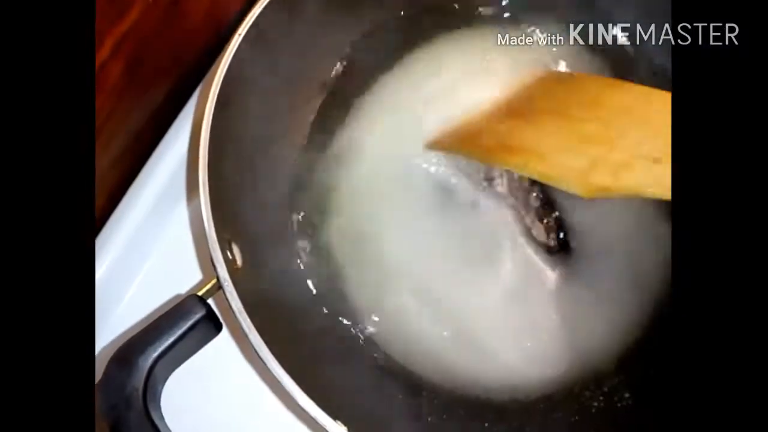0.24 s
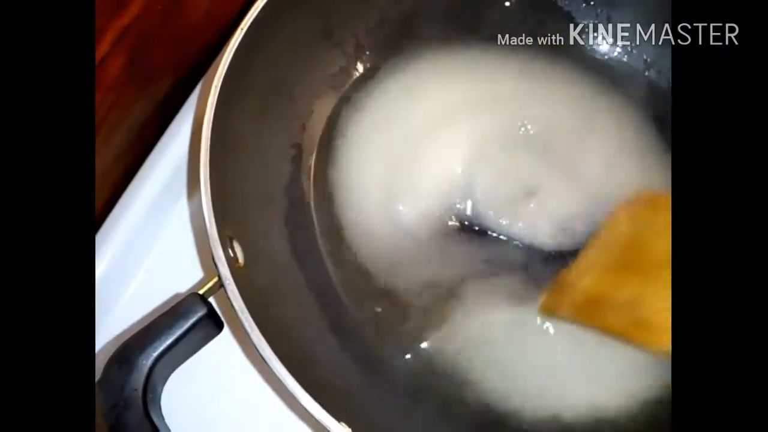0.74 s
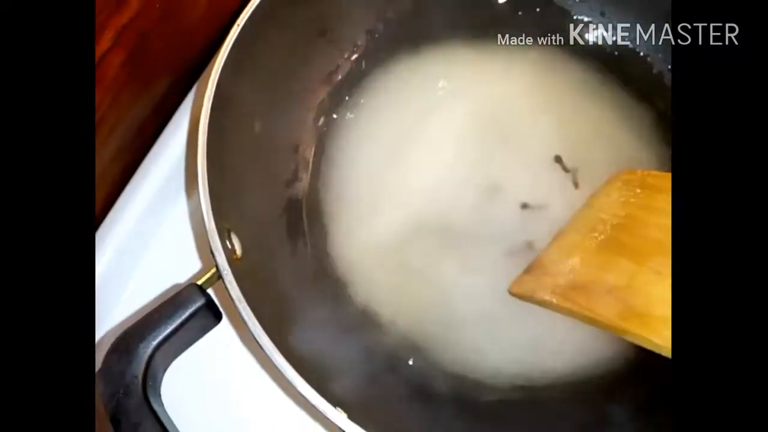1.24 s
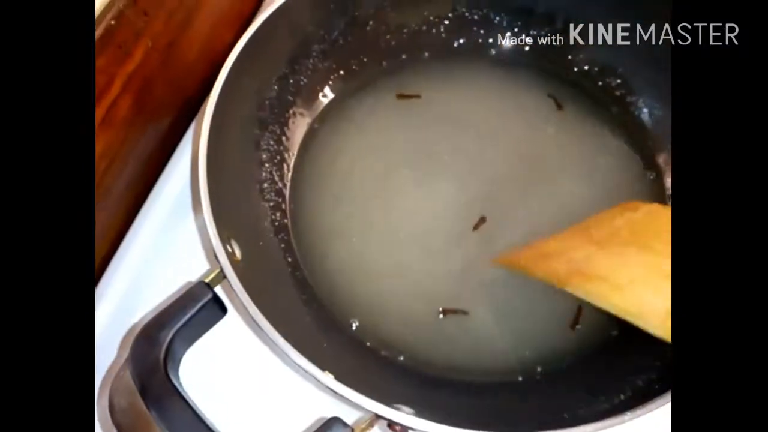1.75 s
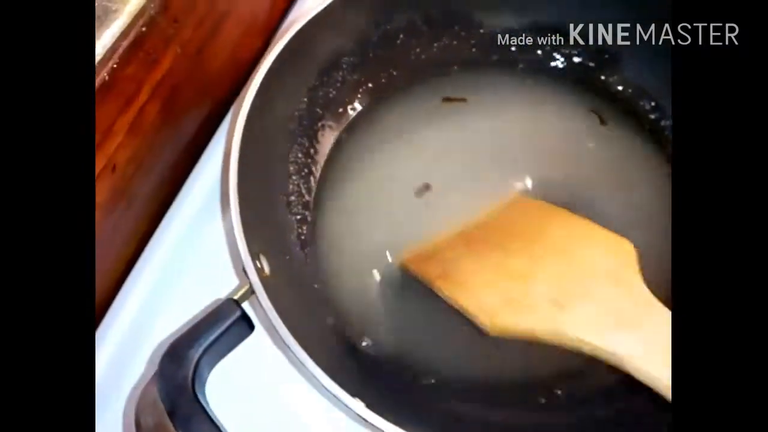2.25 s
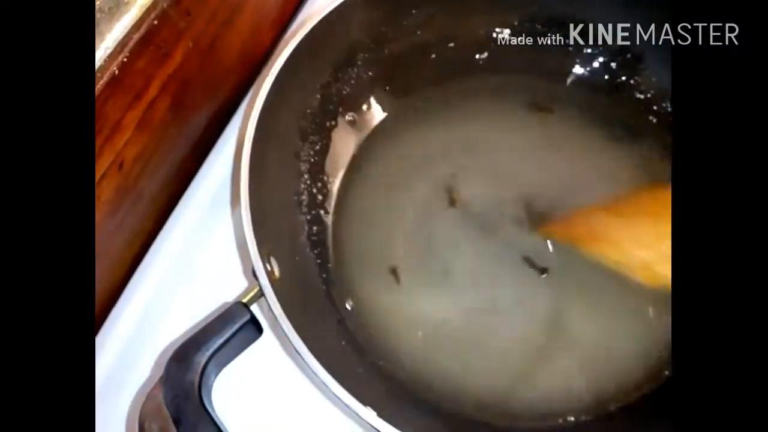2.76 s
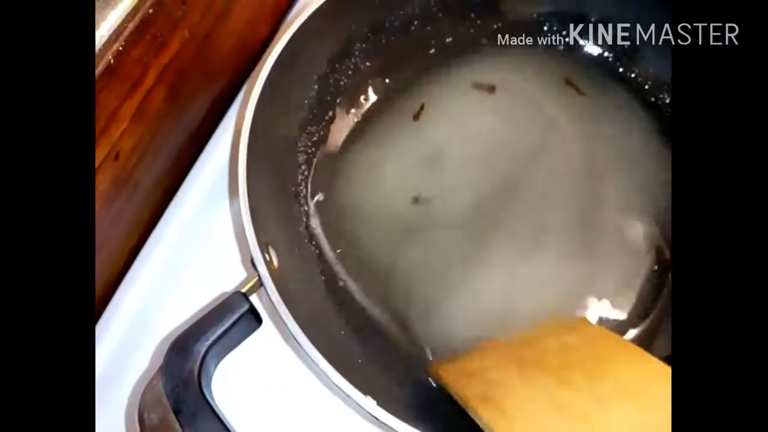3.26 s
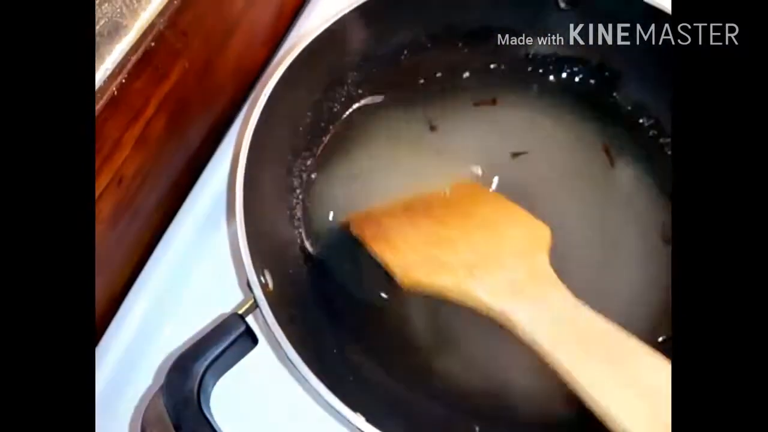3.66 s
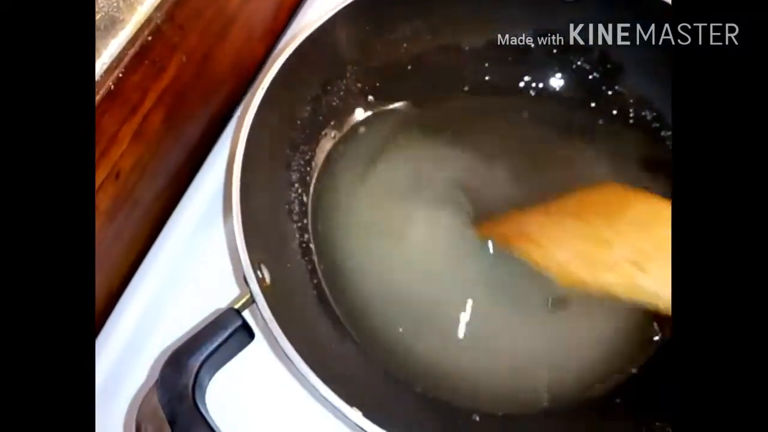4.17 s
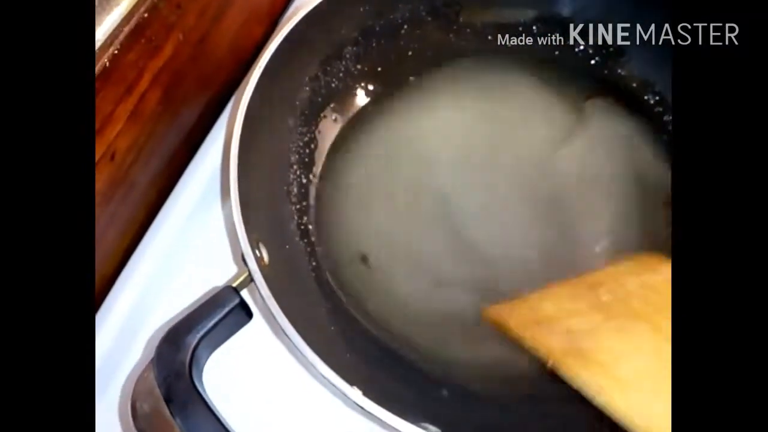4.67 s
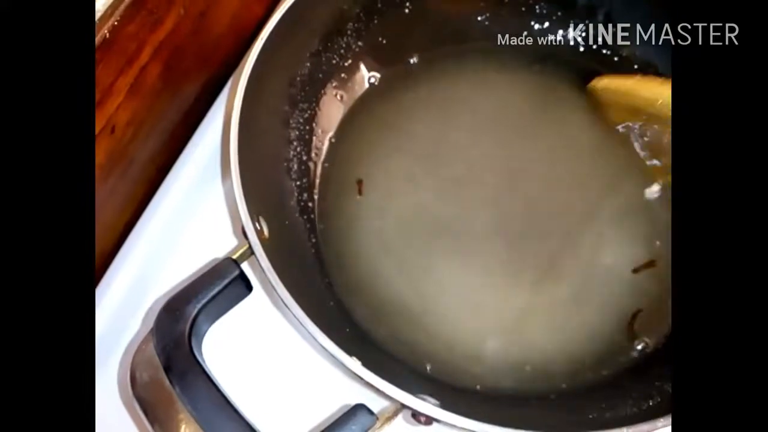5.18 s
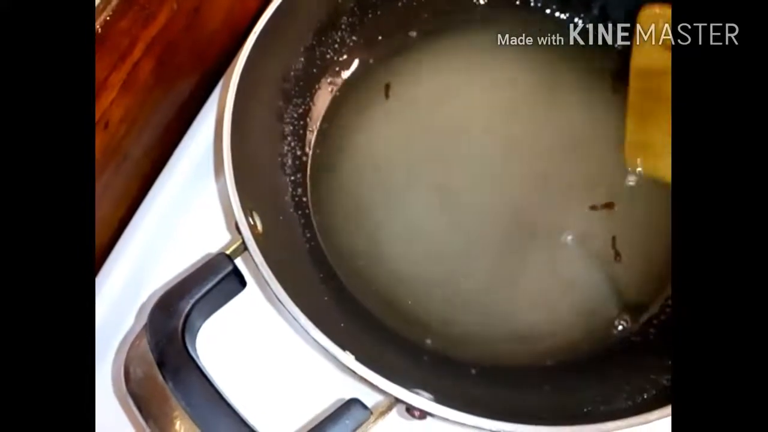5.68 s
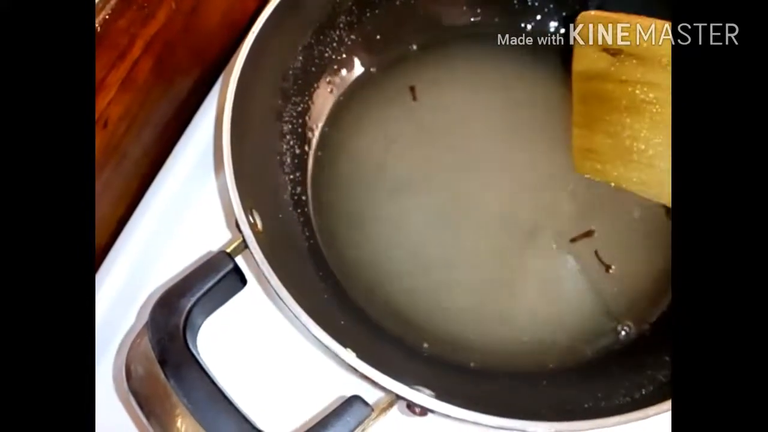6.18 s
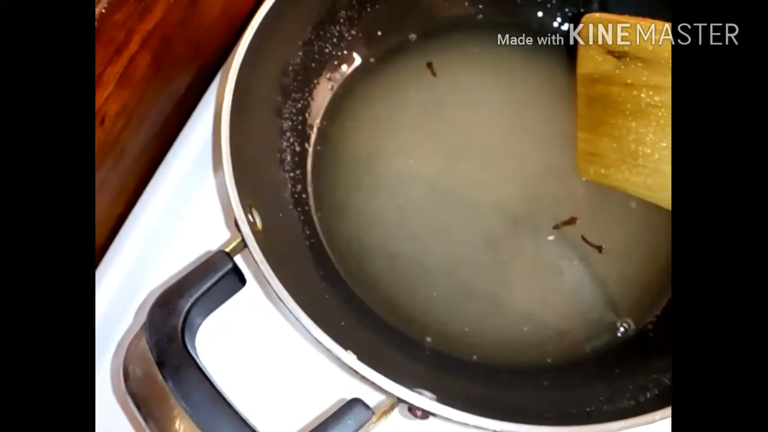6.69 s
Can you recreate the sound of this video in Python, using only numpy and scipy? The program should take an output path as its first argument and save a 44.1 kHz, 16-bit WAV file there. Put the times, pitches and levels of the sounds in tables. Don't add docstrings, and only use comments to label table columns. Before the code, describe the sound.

Close, gritty scraping of wood in a sugary metal pan, opening with a ringing knock and short groan, then quiet room hum.

```python
import sys
import numpy as np
from scipy import signal
from scipy.fft import rfft, irfft, next_fast_len
from scipy.io import wavfile
from scipy.ndimage import uniform_filter1d, map_coordinates

SR = 44100
rng = np.random.default_rng(int(sys.argv[2]) if len(sys.argv) > 2 else 0)


def file_out(sig):
    cols = np.atleast_2d(sig).T
    lim = np.clip(cols, -1, 1)
    pcm = np.round(lim * 32767).astype(np.int16)
    wavfile.write(sys.argv[1], SR, pcm)


def field_ratio(decibels):
    return 10 ** (np.asarray(decibels, dtype=float) / 20)


N = 305605
T = np.arange(N) / SR

# start_s, pressure_db, speed_db
SLIDE_OFF = [(0, -40, -40.5), (.05, -46.5, -48.5), (.09, -40, -48), (.136, -44, -50.5), (.165, -53, -54.5),
             (.254, -52.5, -59), (.352, -67, -64), (.41, -70, -70), (.47, -85.5, -61)]
FLICK = [(0.475, -69, -64), (0.509, -43.5, -47), (0.531, -56.5, -54), (0.579, -53.5, -44.5),
         (0.693, -41.5, -39), (0.795, -48.5, -49.5), (0.831, -63.5, -67), (0.915, -75.5, -73),
         (0.92, -73, -73)]
PUSH = [(2.035, -59, -86), (2.051, -54, -63), (2.15, -50, -55), (2.267, -44, -48.5), (2.361, -39, -50),
        (2.391, -40.5, -49.5), (2.49, -40.5, -48.5), (2.56, -49.5, -49), (2.62, -44.5, -56)]
PULL = [(2.625, -62, -55.5), (2.651, -50.5, -54), (2.663, -49, -58), (2.687, -48.5, -53.5),
        (2.837, -49.5, -49), (3.015, -48, -46.5), (3.13, -70, -60.5)]
DABS = [(3.135, -61, -58), (3.147, -77, -68), (3.159, -49, -49), (3.173, -93, -50.5), (3.249, -63, -62.5),
        (3.263, -62.5, -48), (3.283, -54, -65), (3.331, -64, -66.5), (3.44, -71, -60.5)]
SWEEP = [(3.446, -52.5, -45), (3.494, -47, -53.5), (3.656, -44.5, -52), (3.682, -47.5, -57),
         (3.798, -46.5, -59.5), (3.96, -56.5, -58.5), (4.032, -43.5, -57), (4.058, -61.5, -69),
         (4.125, -47.5, -56.5)]
SCRAPE = [(4.13, -52, -75), (4.146, -45.5, -42), (4.15, -42.5, -48), (4.226, -49.5, -45), (4.41, -46, -41),
          (4.482, -59.5, -52), (4.532, -79.5, -65.5), (4.614, -72, -79), (4.62, -78, -76)]
STROKES = [SLIDE_OFF, FLICK, PUSH, PULL, DABS, SWEEP, SCRAPE]
# grate_db, wall_db, blade_share_db, favoured_wall_pitch_hz
STROKE_PLACES = [
    (1.5, 1.5, 4, 1474),
    (-1, 2.5, 1.5, 1300),
    (-1, 4.5, 2.5, 1500),
    (3.5, 5, -1.5, 1430),
    (3, 0.5, -3.5, 1420),
    (-3.5, 4.5, 1, 1557),
    (-0.5, 2, 2.5, 1385),
]
# time_s, pitch_hz
BLADE_PITCH = [(0, 776), (.6, 812), (.8, 828), (2.15, 745), (2.33, 753), (2.4, 893), (2.5, 940), (2.6, 913),
               (2.7, 793), (3.05, 804), (3.5, 780), (3.65, 795), (3.85, 866), (4, 850), (4.2, 803),
               (4.5, 870)]
# pitch_hz, width_hz, level_db
GRATE_MODES = [(102, 24, -6), (149.9, 13.8, -2), (158.6, 29, 6), (185, 33, -3), (211.5, 12, -1)]
# pitch_hz, width_hz, level_db
LOW_FLOOR_MODES = [(347.3, 33, 2.5), (428, 19, -8.5), (471, 34, -5), (486, 120, 0.5), (581, 15, -13)]
# pitch_hz, width_hz, level_db
HIGH_FLOOR_MODES = [(635, 150, -7), (771, 130, -2.5), (777, 66, 1), (850, 150, -2.5), (899, 8, -5),
                    (1016, 15, -7), (1057, 25, 8.5)]
# pitch_hz, width_hz, level_db
WALL_MODES = [(1273, 170, -18.5), (1384, 113, 15.5), (1491.4, 80, 15), (1567, 150, 13), (1698, 72, 9.5),
              (2020, 200, 3)]
# pitch_hz, width_hz, level_db
RIM_MODES = [(2344, 620, 1.5), (2618, 290, 2.5), (2880, 200, 3.5), (3280, 830, 4), (3570, 200, 7),
             (4080, 400, -4.5), (4444, 210, 4.5), (4695, 350, 4), (5100, 610, 1), (5680, 620, -3),
             (6250, 500, 5), (6580, 350, 0.5), (7460, 710, -2.5)]
# freq_hz, density_db
FINE_GRIT = [(1500, -19), (2500, 3.5), (6000, 14.5), (8000, 10.5), (11000, -3.5), (16000, -16.5)]
# start_s, peak_db, centre_hz
CRACKS = [(0.0634, -26.5, 7350), (0.13, -31, 5850), (0.504, -27, 5000), (0.5473, -33.5, 5200),
          (.562, -30, 6030), (.612, -26.5, 6020), (0.64, -27.5, 6160), (0.685, -17.5, 6580),
          (0.7417, -30.5, 6560), (0.809, -36.5, 6500), (2.094, -40.5, 6400), (2.1306, -33, 4940),
          (2.37, -28.5, 6200), (2.456, -38, 3420), (2.5939, -40.5, 3360), (2.7648, -32.5, 3550),
          (2.824, -31, 4650), (2.888, -26, 6500), (3.1577, -43.5, 3032), (3.2594, -40.5, 2600),
          (3.4463, -22.5, 7100), (4.0014, -42, 3280), (3.932, -45, 3444), (4.0716, -40, 6300),
          (4.144, -34, 3200), (4.188, -43, 5000), (4.252, -36, 3570), (4.2677, -30.5, 5670),
          (4.3104, -25.5, 6300), (4.3997, -18.5, 3680)]
# start_s, thud_db, wall_clack_db, grate_db
BUMPS = [(0.13, -27, -29.5, -27.5), (0.507, -31, -38, -20), (0.7443, -31, -52, -32),
         (2.0491, -36, -34.5, -27), (2.0523, -20, -39, -11), (2.0953, -35, -54, -14.5),
         (2.1314, -45, -35, -21), (2.165, -40, -62, -21.5), (2.5919, -25, -46, -22),
         (2.641, -41.5, -55, -27), (2.8733, -36, -50, -33), (3.268, -28.5, -40, -23),
         (3.4472, -32, -25.5, -32.5), (4.001, -32, -54, -23.5), (4.131, -23, -65, -17.5),
         (4.3089, -32, -32, -25)]
# pitch_hz, width_hz, level_db
NUDGE_MODES = [(138, 41, 7.5), (378, 420, -1), (558, 380, -5.5)]
# pitch_hz, level_db, t60_s
KNOCK_MODES = [(138.3, 2.5, 0.44), (212.7, -4.5, 0.23), (333.5, -5, 0.23), (471, -12.5, 0.26),
               (721, -26.5, 0.98), (866, -35.5, 0.28), (1083, -17.5, 0.5), (1833, -17.5, 0.25),
               (1940, -14.5, 0.43), (2143, -22, 0.28)]
# time_s, slip_rate_hz, level_db
JUDDER = [
    (0.15, 352, -51),
    (0.168, 347, -59),
    (0.198, 366.6, -49),
    (0.24, 375, -52.5),
    (0.31, 361.5, -47),
    (0.365, 360.5, -55.5),
    (0.41, 383, -78),
]
# multiple, level_db
SLIP_HARMONICS = [(1, 2), (2, -9.5), (3, -14.5), (4, -38), (5, -25)]
# freq_hz, density_db
ROOM_HISS = [(20, -14.5), (40, -37), (95, -17), (200, -18.5), (420, -17.5), (1030, -22), (3000, -28.5),
             (6500, -31.5), (16000, -40)]
# freq_hz, gain_db
HISS_TOP = [(13600, 0), (14400, 14), (15500, 2.5)]
# pitch_hz, width_hz, level_db
HUM = [(103.7, 42, -65.5), (171.7, 8.8, -63), (312, 17.7, -66)]
# pitch_hz, level_db
WHINE = [(689, -84), (5244, -93), (10475, -86)]
# freq_hz, left_right_likeness (-1 to 1)
ROOM_ALIKE = [(60, 0.4), (180, 0.79), (550, 0.2), (1650, -0.16), (4970, 0.06), (15000, -0.12)]
# freq_hz, left_right_likeness (-1 to 1)
PAN_ALIKE = [(60, 0.78), (150, 1), (380, 0.74), (950, 0.79), (2380, 0.19), (5980, -0.14), (15000, 0.02)]
# freq_hz, left_minus_right_db
PAN_BALANCE = [(60, -7), (130, 2.5), (290, -3), (640, 0), (1410, -3), (3100, -0.5), (6820, 1.5),
               (15000, -14.5)]
# freq_hz, gain_db
MIC = [(6600, -0.5), (7800, -8), (10000, -4), (13600, -6.5), (14400, -10.5), (15500, 7.5), (15750, -43),
       (16700, -43.5)]
# time_s, gain_db
DROPOUT_GAIN = [
    (0, 1),
    (6.806, 1),
    (6.811, -31),
    (6.824, -40),
    (6.83, -83),
    (6.851, -101),
    (6.857, -30),
    (6.885, -18),
    (6.93, -12),
]


def unit(x):
    return x / np.sqrt(np.mean(x ** 2) + 1e-20)


def along(points, hz):
    f, v = np.transpose(points)
    return np.interp(np.log(hz + 1), np.log(f + 1), v)


def curves(rows):
    s, *cols = np.transpose(rows)
    return [np.interp(T, s, c) for c in cols]


def wobble(rate):
    coarse = T[::16]
    knots = rng.standard_normal(3000)
    return np.interp(T, coarse, map_coordinates(knots, [coarse * min(rate, 400)]))


def filtered(x, response):
    m = next_fast_len(N + 8192)
    return irfft(rfft(x, m) * response(np.fft.rfftfreq(m, 1 / SR)), m)[..., :N]


def resonate(force, hz, width_hz):
    return signal.lfilter(*signal.iirpeak(hz, hz / width_hz, SR), force)


def body(force, modes, drift_db, rate, aim_db=lambda hz: 0):
    rung = 0
    power = 0
    for hz, width_hz, db in modes:
        push = force * field_ratio(db + aim_db(hz) + drift_db * wobble(rate))
        rung = rung + resonate(resonate(push, hz, width_hz), hz, width_hz)
        power += field_ratio(2 * db) * np.pi * width_hz / 2 / SR
    return rung / np.sqrt(power)


def ports(a, b, alike):
    def mid_side(hz):
        turn = np.arccos(np.clip(along(alike, hz), -1, 1)) / 2
        return np.array([np.cos(turn), np.sin(turn)])
    mid, side = filtered(np.array([a, b]), mid_side)
    return np.array([mid + side, mid - side])


def grind(spread_db, clump_db, rate):
    uneven = np.minimum(rng.exponential(size=N), 5)
    sizes = field_ratio(spread_db * uneven + clump_db * wobble(rate))
    return unit(sizes * rng.standard_normal((2, N)))


def scraping():
    press_db, grit_db = curves(np.vstack(STROKES))
    starts = [rows[0][0] for rows in STROKES]
    stroke = np.searchsorted(starts, T, side="right") - 1
    places = np.array(STROKE_PLACES, float)[stroke].T
    grate_db, wall_db, blade_db, wall_hz = uniform_filter1d(places, size=400)

    rest_db, grate_grows = -49, 0.48
    wall_share = 0.18
    grate_db = grate_db + rest_db + grate_grows * (press_db - rest_db) + 0.5
    wall_db = wall_db + wall_share * press_db + (1 - wall_share) * grit_db - 4.5

    touching = (T < FLICK[-1][0]) | ((T > PUSH[0][0]) & (T < SCRAPE[-1][0]))
    drag = touching * grind(spread_db=2, clump_db=1.5, rate=46)
    grit = touching * grind(spread_db=3.5, clump_db=2.6, rate=90)

    blade_hz, = curves(BLADE_PITCH)
    near_blade = lambda hz: 6 - np.minimum(14, 8 * ((hz - blade_hz) / 70) ** 2)
    near_wall = lambda hz: 3 - np.minimum(10, 5 * ((hz - wall_hz) / 150) ** 2)

    out = body(drag * field_ratio(grate_db), GRATE_MODES, drift_db=3.0, rate=28)
    out += body(drag * field_ratio(press_db - 0.5 - blade_db), LOW_FLOOR_MODES, drift_db=4.0, rate=12)
    high_floor = drag * field_ratio(press_db - 7.0 + blade_db)
    out += body(high_floor, HIGH_FLOOR_MODES, drift_db=3.0, rate=8, aim_db=near_blade)
    out += body(drag * field_ratio(wall_db), WALL_MODES, drift_db=2.0, rate=6, aim_db=near_wall)
    out += body(grit * field_ratio(grit_db), RIM_MODES, drift_db=4.0, rate=10)
    out += touching * blade(press_db + blade_db - 10.5)
    fine_db = -57.5 + 1.043 * (grit_db + 56)
    return out + field_ratio(fine_db) * unit(filtered(grit, lambda hz: field_ratio(along(FINE_GRIT, hz))))


def blade(db):
    width_hz = 45
    hz, = curves(BLADE_PITCH)
    turn = np.exp(2j * np.pi * np.cumsum(hz) / SR)
    rough = [wobble(width_hz) + 1j * wobble(width_hz) for port in range(2)]
    return field_ratio(db) * unit(np.real(turn * rough))


def cracks():
    snap, clack, thud, shake = np.zeros((4, 2, N))

    def at(s):
        start = round(s * SR) - 10
        return slice(start, start + 900)

    for s, db, hz in CRACKS:
        sharp, to_wall, to_pan = bursts(count=3)
        bright = 17.0 * resonate(sharp, hz, 0.12 * hz) + 0.25 * sharp + 0.035 * np.diff(sharp, prepend=0)
        snap[:, at(s)] += field_ratio(db + 2.5) * bright / np.abs(bright).max(axis=1, keepdims=True)
        clack[:, at(s)] += field_ratio(db + 0.5) * to_wall
        thud[:, at(s)] += field_ratio(db - 28) * to_pan
    for s, thud_db, clack_db, grate_db in BUMPS:
        to_wall, to_pan, to_grate = bursts(count=3)
        clack[:, at(s)] += field_ratio(clack_db + 13) * to_wall
        thud[:, at(s)] += field_ratio(thud_db - 9) * to_pan
        shake[:, at(s)] += field_ratio(grate_db - 7) * to_grate

    nudged = body(thud, NUDGE_MODES, drift_db=1.0, rate=18)
    shaken = body(shake, GRATE_MODES, drift_db=1.0, rate=16)
    return snap + resonate(clack, 1570, 420) + nudged + shaken


def bursts(count):
    t = np.arange(900) / SR
    sudden = 1 - np.exp(-t / 0.0004)
    fading = field_ratio(-60 * t / 0.0076) + field_ratio(-17 - 60 * t / 0.07)
    return rng.standard_normal((count, 2, 900)) * sudden * fading


def knock():
    ring = np.zeros(N)
    for hz, db, t60 in KNOCK_MODES:
        phase = 2 * np.pi * (hz * T + 0.04 * rng.random()) + hz / 900 * wobble(60)
        ring += field_ratio(db - 60 * T / t60) * np.cos(phase)
    noise = unit(resonate(rng.standard_normal(N), 1500, 1600))
    rattle = noise * field_ratio(-45.5 + 1.9 * wobble(117) - 60 * T / 0.5)
    return rattle + field_ratio(-24.5) * ring


def judder():
    hz, db = curves(JUDDER)
    phase = 2 * np.pi * np.cumsum(hz * (1 + 0.016 * wobble(100))) / SR
    slips = sum(field_ratio(level + 5 + 3 * wobble(36.8)) * np.cos(k * phase) for k, level in SLIP_HARMONICS)
    gate = np.interp(T, [0.12, 0.16, 0.385, 0.42], [0, 1, 1, 0])
    return slips * field_ratio(db) * gate


def kitchen():
    colour = lambda hz: field_ratio(along(ROOM_HISS, hz) + along(HISS_TOP, hz))
    hiss = field_ratio(-61.5) * unit(filtered(rng.standard_normal((2, N)), colour))
    drone = 0
    for hz, width_hz, db in HUM:
        band = unit(resonate(rng.standard_normal((2, N)), hz, width_hz))
        drone = drone + field_ratio(db + 1.7 * wobble(5.9)) * band
    tones = 0
    for hz, db in WHINE:
        tones = tones + field_ratio(db + 1.5 * wobble(5)) * np.sin(2 * np.pi * hz * T + 0.5 * wobble(40))
    return field_ratio(0.12 * wobble(1.0)) * ports(*(hiss + drone), ROOM_ALIKE) + tones


def scene():
    pan = scraping() + cracks()
    lean = lambda hz: field_ratio(along(PAN_BALANCE, hz) * np.array([[0.5], [-0.5]]))
    stirred = filtered(field_ratio(-1.5) * ports(*pan, PAN_ALIKE), lean)
    tonal = (knock() + judder()) * field_ratio([[-1.2], [1.2]])
    return stirred + tonal + kitchen()


def top_cut(x):
    return signal.sosfilt(signal.butter(12, 16680, fs=SR, output="sos"), x)


def record(dry):
    heard = filtered(dry, lambda hz: field_ratio(along(MIC, hz)))
    gain_db, = curves(DROPOUT_GAIN)
    return top_cut(heard * field_ratio(gain_db))


dry = scene()
out = record(dry)
file_out(out)
```